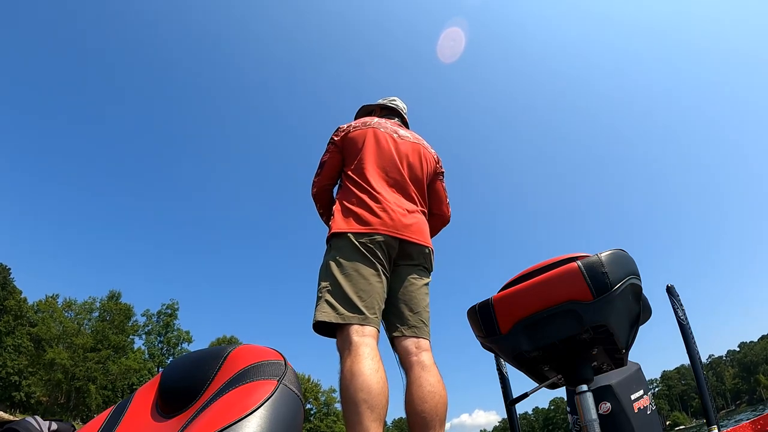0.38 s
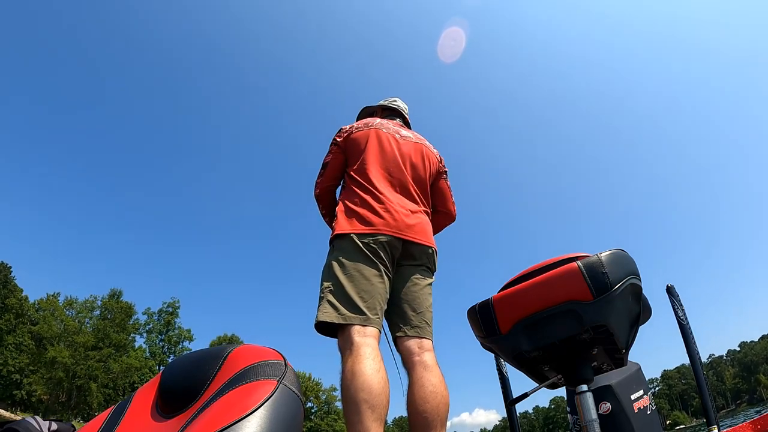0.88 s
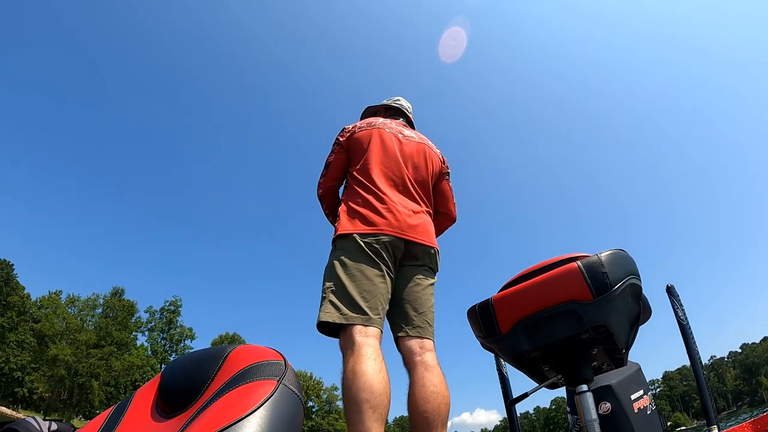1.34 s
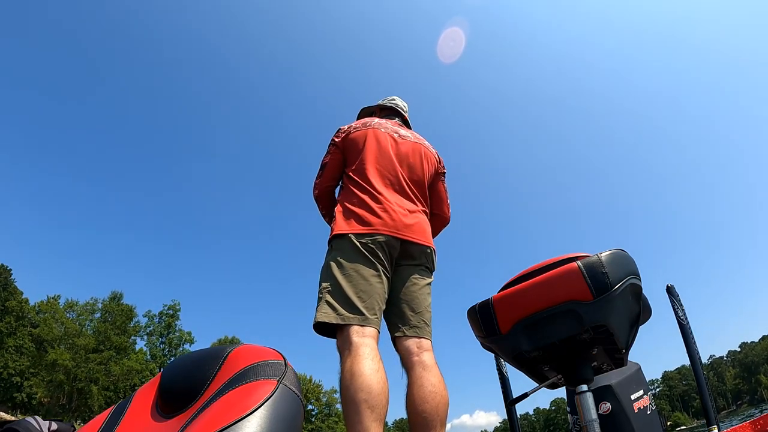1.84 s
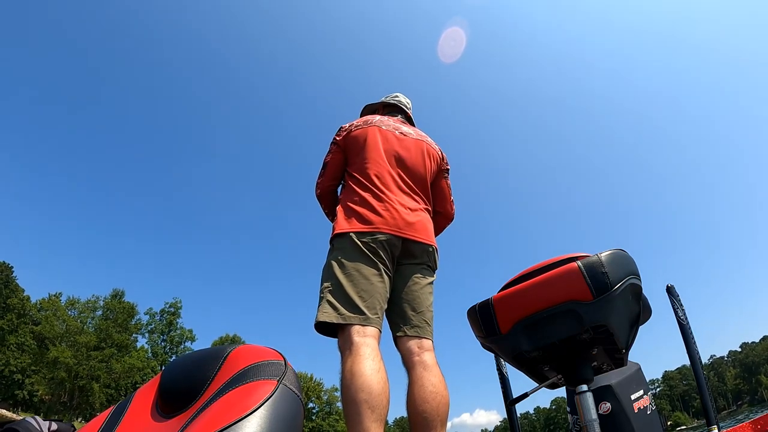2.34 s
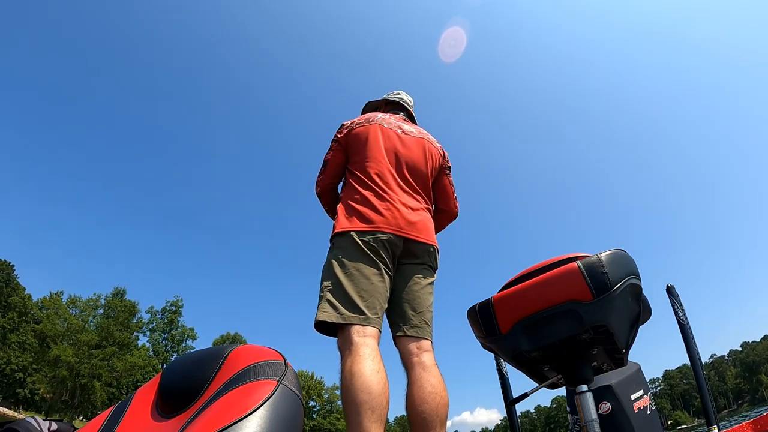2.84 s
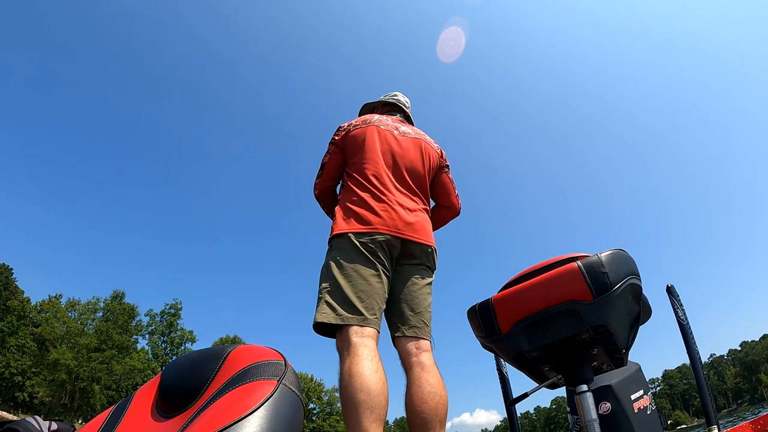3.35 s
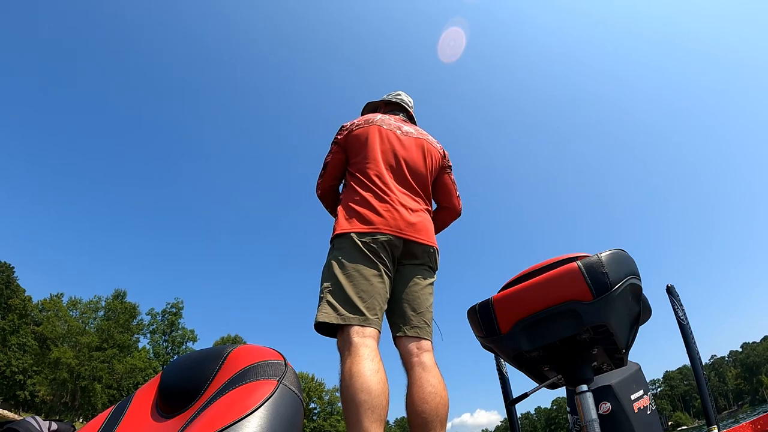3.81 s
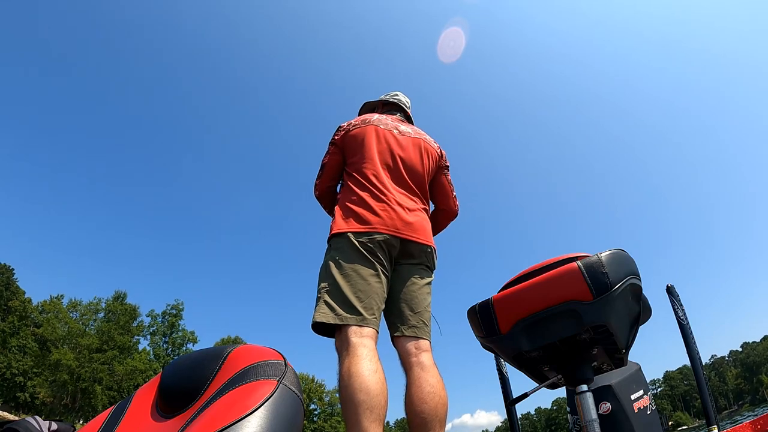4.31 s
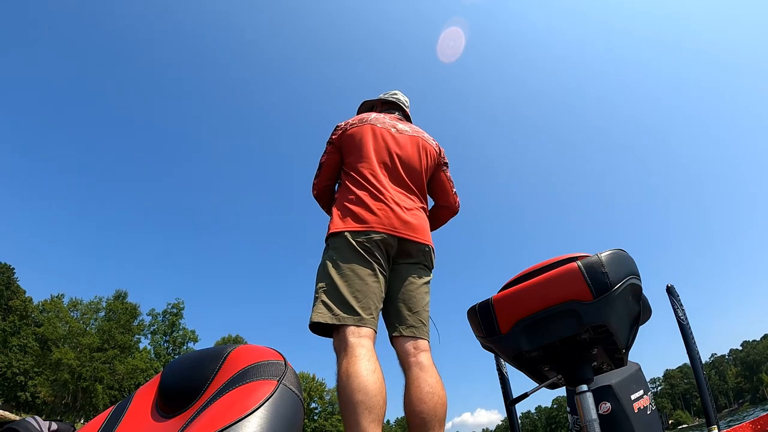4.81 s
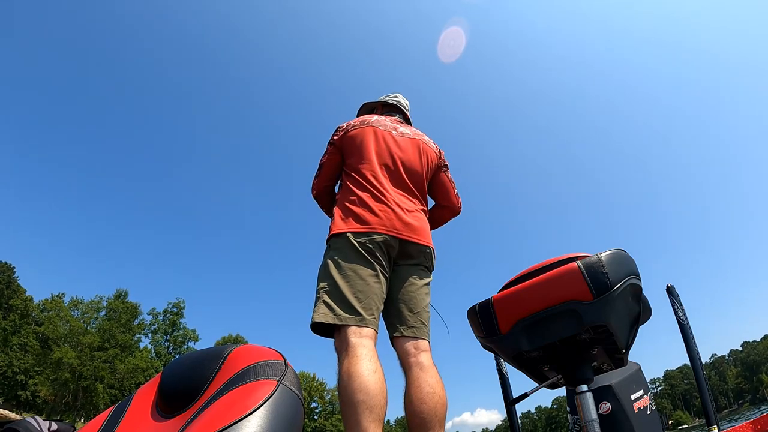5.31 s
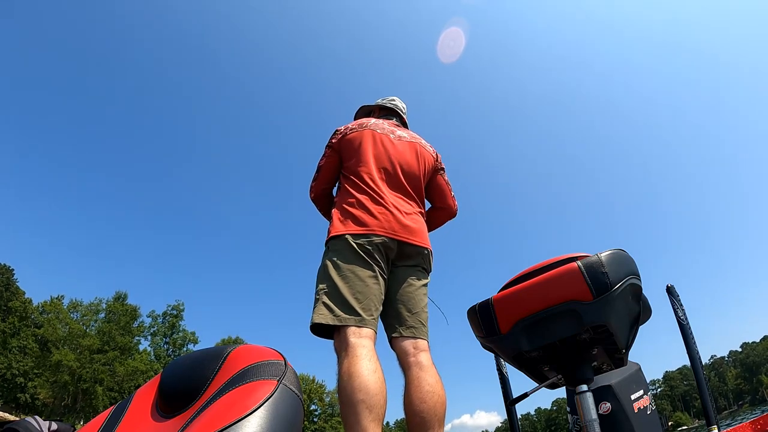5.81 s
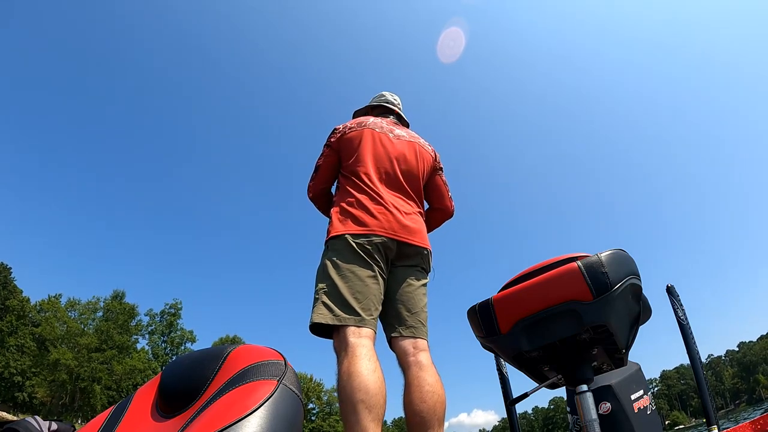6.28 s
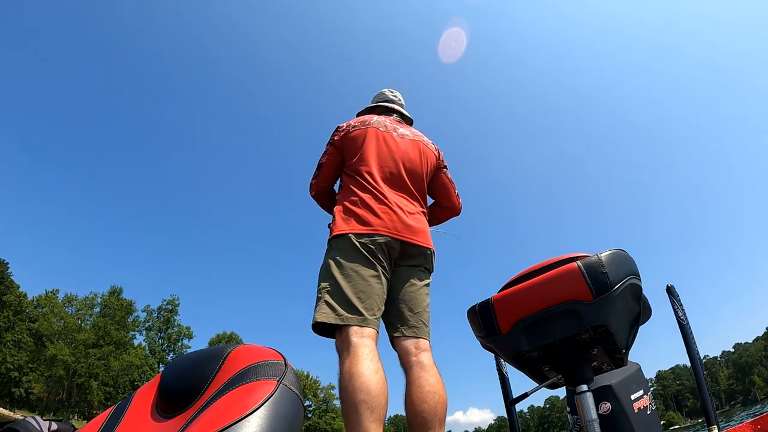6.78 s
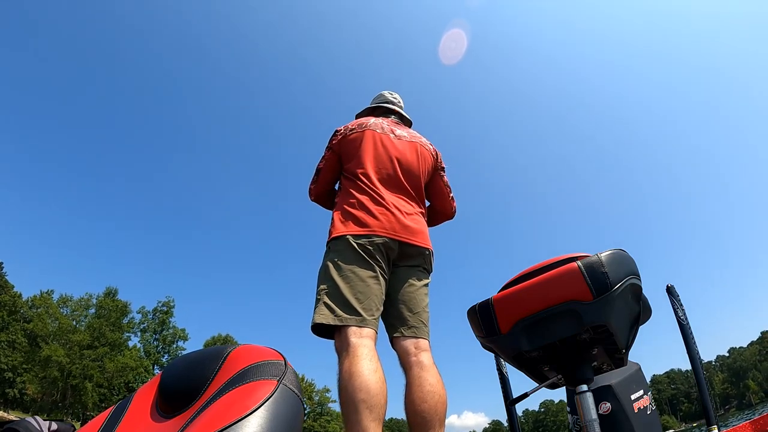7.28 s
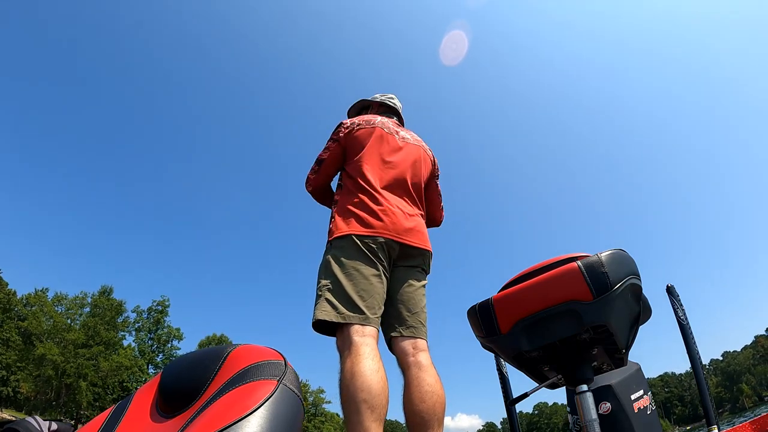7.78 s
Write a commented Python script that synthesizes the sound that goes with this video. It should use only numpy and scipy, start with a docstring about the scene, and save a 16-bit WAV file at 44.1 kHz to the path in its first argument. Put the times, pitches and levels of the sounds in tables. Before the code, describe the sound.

Aboard a small boat adrift on a lake, wind makes a low lumpy rumble on the microphone. Far engine hum sits beneath soft open-water wash. Wavelets lap and clop hollowly at the hull, with a knock around one second, a cluster of ticks after three, and the strongest thumping slaps near five to six. A second faint engine joins late, then everything cuts off.

```python
"""Fishing boat adrift on a lake.

A breeze buffets the microphone: low noise plus single pressure swings. Two far engines idle as hum lines.
Wavelets clop and lap at the hull (short rising tones, noise) and water splashes (decaying noise bands).
Tackle ticks and rustles on deck (noise bursts), thin gliding near-sines whistle, open water washes (noise).
"""
import sys
import numpy as np
from scipy import signal
from scipy.fft import rfft, irfft
from scipy.io import wavfile
from scipy.ndimage import uniform_filter1d

SR = 44100
rng = np.random.default_rng(int(sys.argv[2]) if len(sys.argv) > 2 else 0)


def ratio_of_db(decibels):
    """Turn decibels (scalar or array-like) into linear amplitude factors; 0 dB maps to 1."""
    return 10 ** (np.asarray(decibels, float) / 20)


def int16_out(signal):
    """Quantize to a 16-bit WAV file."""
    q = np.round(np.clip(np.atleast_2d(signal).T, -1, 1) * 32767)
    wavfile.write(sys.argv[1], SR, q.astype(np.int16))


N = 359415  # samples

# breeze strength: time_s, level_db
BREEZE_LEVEL = [(0, -28.5), (.4, -40.5), (1.6, -43), (2.5, -38), (3.1, -39.5), (3.55, -36), (4.3, -35),
                (4.7, -37.5), (5.05, -33), (6.2, -39.5), (6.6, -39.5), (7.1, -37.5), (8.15, -38)]
# turbulence spectrum: freq_hz, relative_density_db
EDDY_SPECTRUM = [(12, -1), (28, 16.5), (60, 11.5), (110, -9.5), (250, -73)]
# single pressure buffets: centre_s, peak_db, pitch_hz
BUFFETS = [(0.221, -21.5, 72.6), (1.732, -21.5, 45), (1.789, -20.5, 52), (2.032, -24, 54.6),
           (2.415, -24, 51.6), (2.497, -22.5, 56), (2.562, -18.5, 62), (2.688, -20, 44.5),
           (3.391, -22.5, 72), (3.574, -21.5, 51.3), (4.166, -18.5, 43.5), (4.422, -24.5, 56.4),
           (4.546, -19.5, 53.5), (4.918, -13.5, 69), (4.948, -18, 82), (4.999, -20.5, 78.4),
           (5.053, -22, 79.5), (5.143, -16, 74), (5.386, -18.5, 51.5), (5.42, -23, 62), (5.626, -21, 64.4),
           (5.957, -22.5, 69), (6.241, -24, 49.3), (6.297, -23.5, 53.3), (7.005, -19.5, 59),
           (7.107, -22, 76)]
BUFFET_WIDTH_CYCLES = 1.09  # at half height

# engine hum lines: multiple of the cycle rate, level_db
FIRST_ENGINE_LINES = [(9, -46), (10, -42.5), (15, -51), (16, -53), (18, -49)]
SECOND_ENGINE_LINES = [(8, -48.5), (9, -52), (14, -51.5)]
# second engine fading up: time_s, gain_db
SECOND_ENGINE_GAIN = [(5.6, -33), (6.0, 1), (8.15, -1)]
FIRST_CYCLE_HZ, SECOND_CYCLE_HZ = 8.87, 15.2
PORT_GAP_CYCLES = 0.031  # phase by which the left port leads

# air pockets squeezed against the hull: centre_s, peak_db, pitch_hz
CLOPS = [(0.073, -41.5, 284), (0.623, -40.5, 463), (0.795, -51, 394), (1.075, -47.5, 500),
         (1.297, -46, 446), (1.272, -31, 168), (1.279, -36, 286), (1.276, -44.5, 750), (2.321, -51.5, 1023),
         (2.34, -30, 320), (3.045, -40.5, 337), (3.07, -45.5, 388), (3.095, -44.5, 387), (3.316, -40, 428),
         (3.331, -44, 418), (4.542, -27.5, 138.4), (4.883, -30.5, 153), (4.892, -27.5, 235),
         (4.895, -49, 910), (4.902, -39, 440), (4.915, -51.5, 1010), (4.915, -57, 1870),
         (4.937, -22, 128.5), (4.967, -31.5, 227), (4.984, -48.5, 1020), (5.001, -48, 955),
         (5.117, -32, 210), (5.15, -51, 585), (5.59, -52, 960), (5.626, -47.5, 618), (5.64, -46.5, 470),
         (5.772, -17, 161), (5.828, -32, 176), (5.861, -32, 171), (5.933, -44.5, 406), (7.105, -51.5, 870),
         (7.13, -33, 282)]
CLOP_WIDTH_MS, CLOP_SHORTENING_POWER = 13.7, 0.18  # width at 300 Hz; power of pitch that shortens it
# wider splashes: onset_s, body_db, spray_db, decay_ms, left_right_db
SPLASHES = [(0.567, -46, -67, 35.5, 3), (1.262, -43, -57.5, 15.2, 8), (4.88, -38, -55, 90, 0),
            (5.62, -46, -75, 30.6, 1.5), (5.78, -52.5, -76, 76, 0), (7.022, -53, -62, 35, 2)]
SPLASH_RISE_S = .005
BODY_HZ, BODY_BAND_HZ, SPRAY_HZ, SPRAY_BAND_HZ = 313, 800, 1300, 3060

# tackle ticks, one row a band: centre_s, level_db, centre_hz, bandwidth_hz, left_right_db
TICKS = [(3.169, -53.5, 1850, 900, -1), (3.226, -66, 4400, 1100, -2), (3.292, -57.5, 5050, 3600, -1.5),
         (3.296, -54, 4460, 900, -4), (3.293, -51, 1810, 2600, -2), (3.551, -78, 9900, 1500, 0),
         (3.561, -64.5, 3440, 1400, -1), (3.622, -70, 7800, 4500, 0), (3.653, -69, 3280, 900, -4),
         (4.064, -61, 4760, 1300, -5), (4.095, -51, 1190, 810, -3), (4.215, -67, 3180, 1610, 0),
         (4.719, -58.5, 3600, 5970, 4.5), (4.719, -44.5, 1700, 990, 7.5), (4.722, -48.5, 900, 900, 6),
         (4.871, -50, 796, 1200, 13.5), (4.894, -66.5, 4700, 6000, 4.5), (5.033, -65, 2300, 1500, -2),
         (5.621, -62, 2080, 790, 8), (6.012, -61, 1800, 1200, 3), (7.416, -50.5, 1410, 800, 1.5)]
TICK_WIDTH_MS = 3.5  # before the fall is stretched
# rustle of line and cloth: centre_s, level_db, width_ms
RUSTLES = [(3.308, -67.5, 32), (3.585, -73.5, 120), (4.9, -72, 60), (4.96, -74, 30), (5.025, -74, 40)]
RUSTLE_HZ, RUSTLE_BAND_HZ = 5470, 7200

# whistles: start_s, length_s, opening_hz, held_hz, closing_hz, top_db
WHISTLES = [(.58, .21, 6050, 6040, 6250, -82), (1.53, .17, 6030, 6020, 6050, -81),
            (2.065, .275, 6150, 5970, 6650, -76), (2.6, .295, 6400, 5900, 6550, -77),
            (7.04, .34, 7110, 7210, 7280, -82)]
# brief gaps in the long whistles: centre_s, width_ms
WHISTLE_GAPS = [(2.216, 14), (2.797, 60)]
GLIDE_POWER = 12  # higher = sharper opening and closing glides
SWELL_DB_PER_LENGTH = 9  # slope either side of the loudest point

# wash spectrum: freq_hz, relative_density_db
WASH_SPECTRUM = [(60, -27), (120, 1), (180, -4.5), (310, -16), (670, -27.5), (800, -27), (950, -31),
                 (1250, -27), (1600, -29.5), (2500, -42), (3800, -51.5), (5000, -49.5), (7600, -53),
                 (8600, -64.5), (11000, -70)]
# wash likeness of the two ports: freq_hz, correlation
WASH_LIKENESS = [(100, 1), (600, 0.74), (1500, 0.5), (6000, 0.51)]
# wash balance: freq_hz, left_right_db
WASH_BALANCE = [(100, -0.5), (500, 0), (2000, 2.5), (6000, 2)]
# wash phase: freq_hz, left_lead_rad
WASH_LEAD = [(700, -0.2), (1200, 0.15), (3000, -0.33)]
WASH_DB = -46


def evened(x):
    """Scales to rms 1."""
    return x / np.sqrt(np.mean(x ** 2) + 1e-20)


def read(points, hz):
    """Reads a table on a log-frequency axis."""
    f, value = np.transpose(points)
    return np.interp(np.log(hz + 1), np.log(f + 1), value)


def along(points):
    """Reads a table over time, one value a sample."""
    s, value = np.transpose(points)
    return np.interp(np.arange(N) / SR, s, value)


def sides(left_right_db):
    """Left and right gains."""
    return ratio_of_db(np.array([[left_right_db / 2], [-left_right_db / 2]]))


def add(mix, centre_s, sound):
    """Mixes a sound in, centred on centre_s."""
    start = round(centre_s * SR) - sound.shape[1] // 2
    sound = sound[:, max(-start, 0):]
    start = max(start, 0)
    mix[:, start:start + sound.shape[1]] += sound


def drift(top_hz):
    """Slow random curve of rms 1: 20 sines of chance phase up to top_hz."""
    steps = np.arange(0, N + 64, 64)
    slow = np.zeros(len(steps))
    for hz in np.geomspace(top_hz / 20, top_hz, 20):
        slow += np.sin(2 * np.pi * (hz * steps / SR + rng.random())) / np.sqrt(hz)
    return np.interp(np.arange(N), steps, evened(slow))


def hump(width_ms, tail=1):
    """Time axis (s) and a bell of the given half-height width; tail stretches its fall."""
    reach_s = 4 * width_ms / 1000
    t = np.arange(-reach_s, reach_s, 1 / SR)
    spread_s = width_ms / 1000 / np.sqrt(8 * np.log(2)) * np.where(t > 0, tail, 1)
    return t, np.exp(-.5 * (t / spread_s) ** 2)


def stereo_noise(spectrum, size, same, lean_db, lead_rad, patchy_db):
    """Random short-time spectra with drifting patches, heard by two close microphone ports."""
    hop = size // 4
    hz = np.fft.rfftfreq(size, 1 / SR)[:, None]
    a, b, c, d, patches = rng.standard_normal((N // hop + 5, size // 2 + 1, 5)).T
    patches = uniform_filter1d(patches, size=14, axis=0)  # over frequency
    patches = evened(uniform_filter1d(patches, size=8, axis=1))  # over time
    likeness = np.clip(same(hz), 0, 1)
    left = a + 1j * b
    shared = likeness * left * np.exp(-1j * lead_rad(hz))
    right = shared + np.sqrt(1 - likeness ** 2) * (c + 1j * d)
    lean = ratio_of_db(lean_db(hz) / 2)
    z = np.array([left * lean, right / lean])
    z *= ratio_of_db(read(spectrum, hz) + patchy_db * patches)
    return evened(signal.istft(z, nperseg=size, noverlap=size - hop)[1][:, :N])


def slosh(size, hz, band_hz, crackle_db=0):
    """Soft-skirted noise band, partly alike at both ports, broken into crackles a few ms apart."""
    near, other, chance = rng.standard_normal((3, size))
    crackle = ratio_of_db(crackle_db * evened(uniform_filter1d(chance, size=90)))
    shape = 1 / (1 + ((np.fft.rfftfreq(size, 1 / SR) - hz) / (.5 * band_hz)) ** 2) ** 2
    both = np.array([near, .65 * near + .7 * other]) * crackle
    return evened(irfft(rfft(both) * shape, size))


def breeze():
    """Lumpy low turbulence, stronger at the right port, with single pressure buffets standing out."""
    eddies = stereo_noise(EDDY_SPECTRUM, size=4096, same=lambda hz: .88, lean_db=lambda hz: -4.5,
                          lead_rad=lambda hz: 0, patchy_db=0.5)
    out = eddies * ratio_of_db(along(BREEZE_LEVEL) + 2 * drift(top_hz=20))
    for (s, db, hz), phase in zip(BUFFETS, rng.random((len(BUFFETS), 2))):
        t, bell = hump(1000 * BUFFET_WIDTH_CYCLES / hz)
        port_gap = 0.024 * (phase[1] - .5) * np.array([[1], [-1]])  # cycles
        swing = bell * np.cos(2 * np.pi * (hz * t + phase[0] + port_gap))
        add(out, s, ratio_of_db(db) * sides(-4 + 4.5 * np.log2(hz / 55)) * swing)
    return out


def engine(cycle_hz, lines, wander, flutter_db):
    """Multiples of the firing cycle; speed hunts, each line flutters on its way over the water."""
    turns = np.cumsum(cycle_hz * (1 + wander * drift(top_hz=1.3))) / SR
    port_gap = np.array([[1], [-1]]) * PORT_GAP_CYCLES / 2
    out = np.zeros((2, N))
    for multiple, db in lines:
        level = ratio_of_db(db + flutter_db * drift(top_hz=18)) * np.sqrt(2)
        out += level * np.cos(2 * np.pi * (multiple * turns + rng.random() + port_gap))
    return out


def clops():
    """Pockets ring a few cycles, rising as they shrink, over sloshing noise; higher ones lie further left."""
    out = np.zeros((2, N))
    t = np.arange(-.12, .12, 1 / SR)
    fade = np.exp(np.where(t > 0, -t / 0.041, t / 0.021))
    for (s, db, hz), phase in zip(CLOPS, rng.random((len(CLOPS), 1))):
        ring_t, bell = hump(CLOP_WIDTH_MS * (300 / hz) ** CLOP_SHORTENING_POWER, tail=1.17)
        place = ratio_of_db(db) * sides(3 * np.log2(hz / 200))
        ring = bell * np.cos(2 * np.pi * (hz * (ring_t + 1.2 * ring_t ** 2) + phase))
        add(out, s, place * ring)
        add(out, s, place * ratio_of_db(-10.5) * fade * slosh(len(t), 0.99 * hz, 1.03 * hz))
    return out


def lapping(count):
    """Small ripples blip along the hull at chance moments, the higher ones fainter and shorter."""
    out = np.zeros((2, N))
    for when, pitch, size, side in rng.random((count, 4)):
        hz = 300 * 7 ** pitch
        db = -57 - 16 * pitch + 7 * size ** 2
        t, bell = hump(3000 / hz + 2)  # three cycles plus 2 ms
        blip = bell * np.sin(2 * np.pi * hz * t)
        add(out, when * (N / SR - .1), ratio_of_db(db) * sides(12 * side - 4) * blip)
    return out


def splashes():
    """A dull body and a broken bright spray, starting abruptly and trailing off."""
    out = np.zeros((2, N))
    for s, body_db, spray_db, decay_ms, left_right_db in SPLASHES:
        reach_s = 4 * decay_ms / 1000
        t = np.arange(-reach_s, reach_s, 1 / SR)
        fade = np.exp(np.where(t > 0, -1000 * t / decay_ms, t / SPLASH_RISE_S))
        body = ratio_of_db(body_db) * slosh(len(t), BODY_HZ, BODY_BAND_HZ, crackle_db=2.5)
        spray = ratio_of_db(spray_db) * slosh(len(t), SPRAY_HZ, SPRAY_BAND_HZ, crackle_db=4)
        add(out, s, sides(left_right_db) * fade * (body + spray))
    return out


def ticks():
    """A short wide-band crack on a scratchy noise band, quick to rise, slower to die."""
    out = np.zeros((2, N))
    for s, db, hz, band_hz, left_right_db in TICKS:
        t, bell = hump(TICK_WIDTH_MS, tail=5.7)
        ring = bell * slosh(len(t), hz, band_hz, crackle_db=2)
        crack = ratio_of_db(-9) * bell ** 10 * slosh(len(t), hz, 4 * band_hz)
        add(out, s, ratio_of_db(db) * sides(left_right_db) * (ring + crack))
    return out


def rustles():
    """Grainy high noise, swelling and fading."""
    out = np.zeros((2, N))
    for s, db, width_ms in RUSTLES:
        t, bell = hump(width_ms)
        add(out, s, ratio_of_db(db) * bell * slosh(len(t), RUSTLE_HZ, RUSTLE_BAND_HZ, crackle_db=2.2))
    return out


def whistle(start_s, length_s, opening_hz, held_hz, closing_hz, top_db):
    """Near-sine that glides in, holds, grows and flicks up at the end, quivering in pitch and level."""
    u = np.arange(0, 1, 1 / (length_s * SR))  # 0 to 1 through the note
    opening_glide = (opening_hz - held_hz) * (1 - u) ** GLIDE_POWER
    closing_glide = (closing_hz - held_hz) * u ** GLIDE_POWER
    wobble, flutter = (evened(row) for row in uniform_filter1d(rng.standard_normal((2, len(u))), size=500))
    pitch_hz = held_hz + opening_glide + closing_glide + 22 * wobble
    tone = np.sqrt(2) * np.cos(2 * np.pi * np.cumsum(pitch_hz) / SR)
    quiver = 1 + .3 * flutter
    swell = ratio_of_db(top_db - SWELL_DB_PER_LENGTH * abs(.8 - u)) * signal.windows.tukey(len(u), .35)
    for gap_s, width_ms in WHISTLE_GAPS:
        swell = swell * (1 - np.exp(-(2000 * (start_s + u * length_s - gap_s) / width_ms) ** 2))
    return start_s + length_s / 2, tone * quiver * swell * sides(-1)


def wash():
    """Noise of open water and far shore, swelling a little."""
    noise = stereo_noise(WASH_SPECTRUM, size=2048, same=lambda hz: read(WASH_LIKENESS, hz),
                         lean_db=lambda hz: read(WASH_BALANCE, hz),
                         lead_rad=lambda hz: read(WASH_LEAD, hz), patchy_db=1.5)
    return ratio_of_db(WASH_DB + .6 * drift(top_hz=8)) * noise


def scene():
    """All sources at the microphone."""
    mix = breeze()
    mix += engine(FIRST_CYCLE_HZ, FIRST_ENGINE_LINES, wander=.006, flutter_db=3)
    second = engine(SECOND_CYCLE_HZ, SECOND_ENGINE_LINES, wander=.007, flutter_db=3.5)
    mix += second * ratio_of_db(along(SECOND_ENGINE_GAIN))
    mix += clops() + lapping(count=450) + splashes()
    mix += ticks() + rustles()
    for row in WHISTLES:
        add(mix, *whistle(*row))
    return mix + wash()


def top_cut(x):
    """Nothing passes above the cut-off."""
    return signal.sosfilt(signal.butter(12, 12450, fs=SR, output="sos"), x)


def record(dry):
    """The finished mix as delivered."""
    return top_cut(dry)


dry = scene()
out = record(dry)
int16_out(out)
```